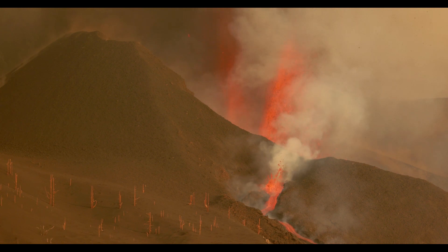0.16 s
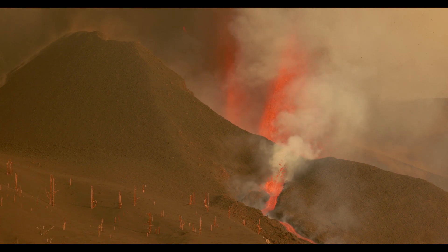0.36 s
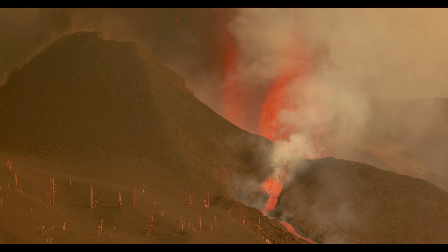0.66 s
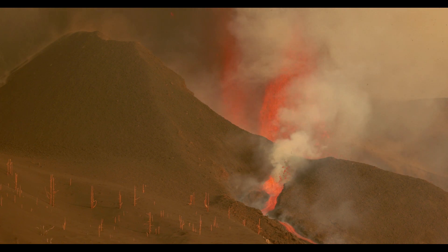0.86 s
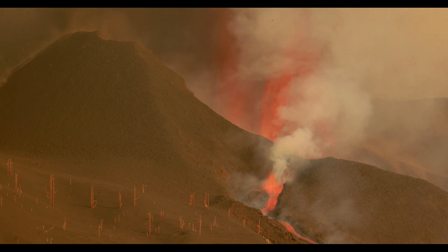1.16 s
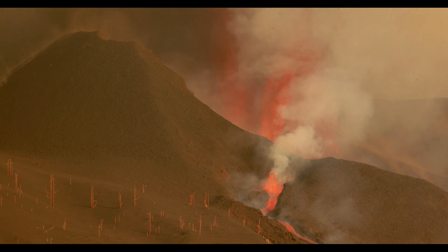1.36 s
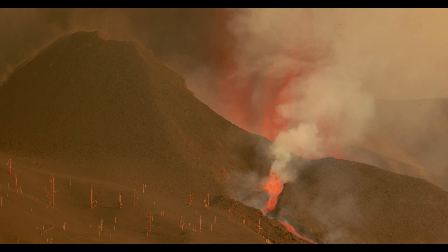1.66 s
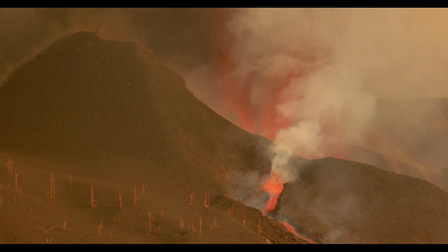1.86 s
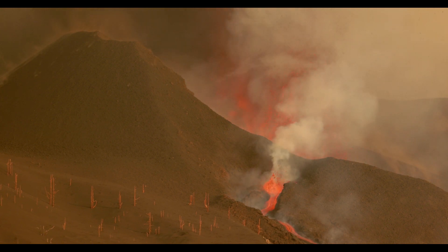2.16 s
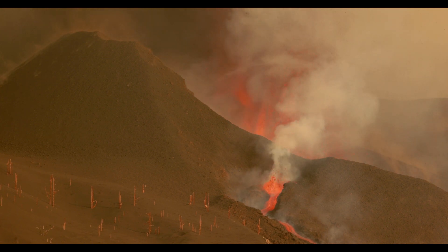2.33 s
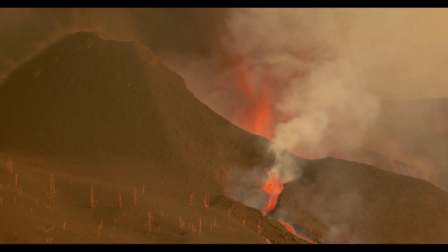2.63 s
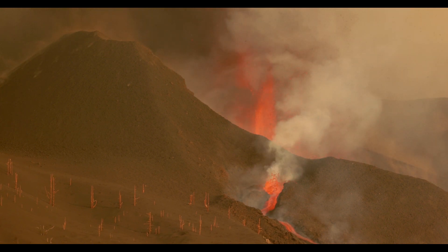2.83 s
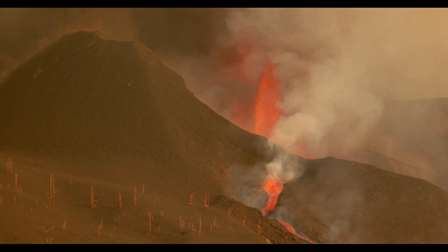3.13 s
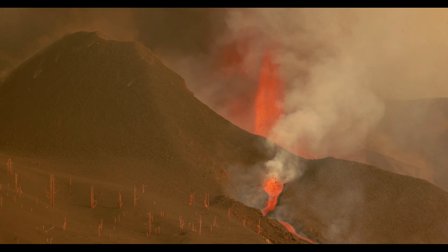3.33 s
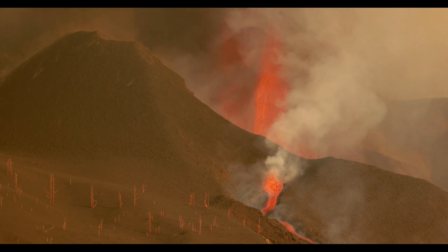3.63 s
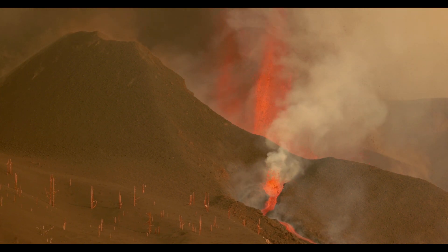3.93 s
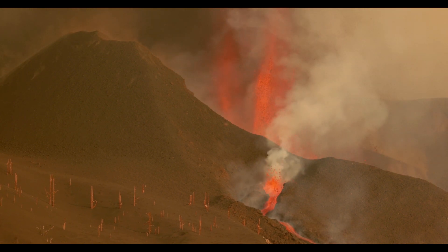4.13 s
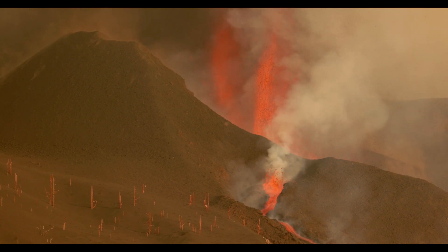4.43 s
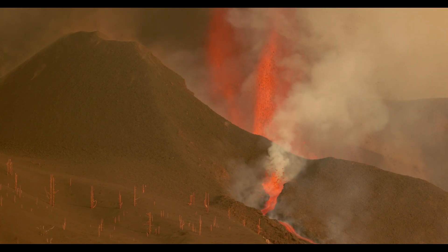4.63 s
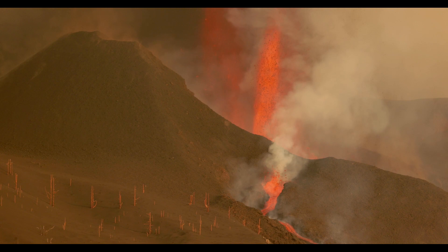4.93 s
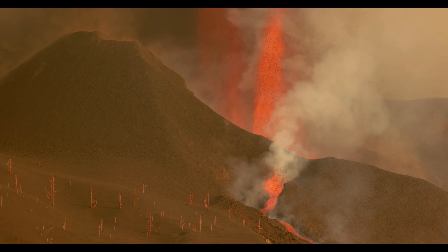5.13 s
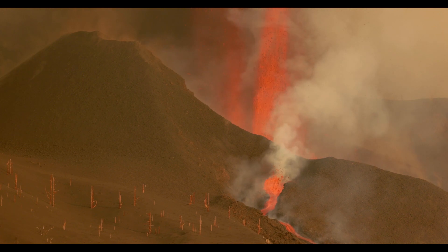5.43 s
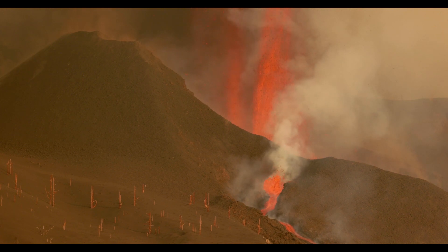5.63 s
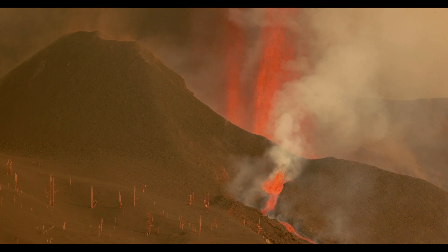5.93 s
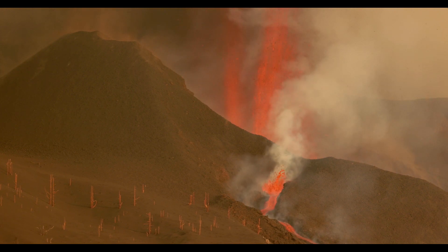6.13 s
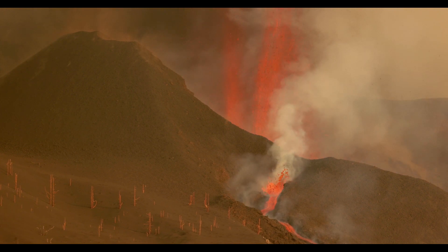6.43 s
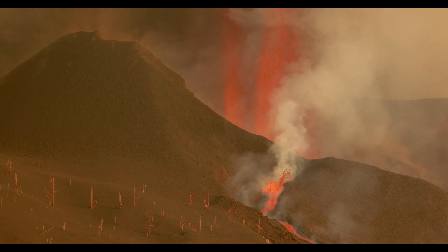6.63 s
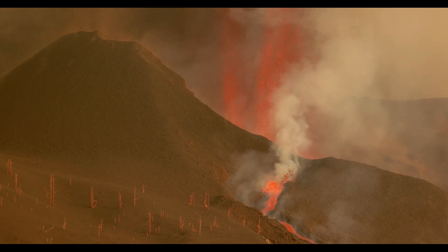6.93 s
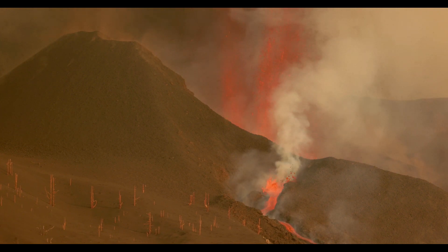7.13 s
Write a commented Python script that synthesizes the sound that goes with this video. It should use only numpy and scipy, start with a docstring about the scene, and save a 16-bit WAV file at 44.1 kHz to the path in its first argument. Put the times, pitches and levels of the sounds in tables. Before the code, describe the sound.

A lava fountain booms across a valley, heard by one mono microphone in the open. The bassy roar dips early, rebuilds to a loud peak near three seconds, then rolls on in irregular surges. Muffled low knocks stand out from the middle onward, and low wind buffeting grows. Very faint nearby details include early bright rustling, dry ticks, brief pips and a high thin whine.

```python
"""Distant lava fountain

Lava fountains roar from a vent far across a valley: countless random gas bursts, shaped by spectra, merge into a
deep rumble that sags and swells; a reflection notches it. Short dull thumps (damped pulses), perhaps wind knocking the
microphone, stand out. Close by are a soft hiss and wind (filtered noise), a thin tone that glides up and later holds
near 4350 Hz, perhaps a cricket, and pips (all sines), a rustle (fine grains) and small ticks (decaying noise)."""
import sys
import numpy as np
from scipy import signal
from scipy.fft import rfft, irfft
from scipy.io import wavfile
from scipy.ndimage import uniform_filter1d, minimum_filter1d

SR = 44100
rng = np.random.default_rng(int(sys.argv[2]) if len(sys.argv) > 2 else 0)


def file_out(sig):
    """Save sig as 16-bit WAV at sys.argv[1]."""
    # one column per channel
    cols = np.atleast_2d(sig).T
    # limit, then scale
    lim = np.clip(cols, -1, 1)
    pcm = np.round(lim * 32767).astype(np.int16)
    wavfile.write(sys.argv[1], SR, pcm)


N = 321048  # length in samples


def gain_of(db):
    """Logarithmic level: 20 dB is a factor of ten in amplitude."""
    return 10 ** (np.asarray(db) / 20)


def evened(x):
    """Normalisation: scales the root mean square to 1."""
    return x / np.sqrt(np.mean(x ** 2) + 1e-20)


def curve(rows):
    """Linear interpolation in time: every column of a table, one value a sample."""
    s, *columns = np.transpose(rows)
    return [np.interp(np.arange(N) / SR, s, c) for c in columns]


def read(points, hz):
    """Interpolation on a logarithmic frequency axis: a spectrum table at the given frequencies."""
    f, db = np.transpose(points)
    return np.interp(np.log(hz + 1), np.log(f + 1), db)


def coloured(x, points):
    """Linear filtering: multiplies the spectrum of x by the table; the rms becomes 1."""
    response = gain_of(read(points, np.fft.rfftfreq(N, 1 / SR)))
    return evened(irfft(rfft(x) * response, N))


def unit_band(x, band):
    """Parseval's theorem: scales x so that its part inside the band has rms 1."""
    hz, power = np.fft.rfftfreq(len(x), 1 / SR), abs(rfft(x)) ** 2
    inside = (hz > band[0]) & (hz < band[1])
    return evened(x) * np.sqrt(power.sum() / power[inside].sum())


def bursts(per_s, spread_db):
    """Shot noise: random pops of either sign, a few much larger than the rest."""
    size = gain_of(spread_db * np.minimum(rng.exponential(1, N), 4))
    happens = rng.random(N) < per_s / SR
    return size * rng.standard_normal(N) * happens


def drift(seconds):
    """Low-passed noise: a slow random course of rms 1."""
    width = max(round(seconds * SR), 1)
    return evened(uniform_filter1d(uniform_filter1d(rng.standard_normal(N), width), width))


def steadied(x, seconds, share):
    """Envelope compression: irons out part of a noise's chance lumps, for a steadier sound."""
    width = round(seconds * SR)
    power = uniform_filter1d(uniform_filter1d(x ** 2, width), width)
    return evened(x / (abs(power) + .02) ** (share / 2))


def bump(centre_s, width_s):
    """Gaussian envelope: a rise and fall of height 1; the width is its standard deviation."""
    return np.exp(-.5 * ((np.arange(N) / SR - centre_s) / width_s) ** 2)


def swells(rows, edge_s):
    """Amplitude envelope: events that fade in, hold and fade out; each fade is centred on its listed time."""
    t = np.arange(N) / SR
    total = 0
    for start, end, db in rows:
        openness = np.clip(np.minimum(t - start, end - t) / edge_s + .5, 0, 1)
        total = total + gain_of(db) * openness ** 2
    return total


def add(mix, s, sound):
    """Superposition: adds a sound to the mix from time s."""
    part = mix[round(s * SR):][:len(sound)]
    part += sound[:len(part)]


PIVOT_DB = -22  # boom level at which a following layer has its pivot level


def follow(boom_db, law):
    """Level law: a layer's level is linear in the boom's level and in time."""
    pivot_db, share, db_per_s = law
    return pivot_db + share * (boom_db - PIVOT_DB) + db_per_s * np.arange(N) / SR


# course of the fountain: t/s, boom level before drift and lulls/dB (110-380 Hz), extra roar/dB, extra grit/dB
FOUNTAIN = [(0, -18.5, -5.5, 0.5), (.12, -20.5, -1.5, -1), (.3, -27, 2.5, 2), (.55, -25, 0.5, -0.5),
            (.85, -33, -1, -3.5), (1.2, -31, 1, -1), (1.48, -37, 4, 1.5), (1.84, -24.5, 0, 0.5),
            (2.0, -24, 4.5, 2), (2.27, -23.5, 1, 2.5), (2.45, -16.5, -2, 0), (2.65, -19.5, 0.5, 1.5),
            (2.9, -21, 1, 2), (3.1, -11, -1.5, -2.5), (3.44, -17.5, 0, 0), (3.62, -14.5, 1.5, -3.5),
            (3.85, -20.5, 2, 1), (4.08, -23.5, 2, 2.5), (4.18, -18, 0, 1.5), (4.74, -19, -1, -1),
            (5.1, -23.5, 0.5, 2), (5.45, -19.5, 1, 2), (5.7, -24.5, 1.5, 2.5), (6.25, -23, -1, -1.5),
            (6.41, -22, 0, -1), (6.55, -27.5, 2, 0.5), (6.85, -27.5, -1, 1), (7.05, -26, 2, -2.5),
            (7.28, -27.5, -2.5, -2)]
# spectra of the four layers: f/Hz, relative level per hertz/dB
THUD_SPECTRUM = [(10, -84.5), (30, -45), (55, -18), (95, 1.5), (130, -3.5), (250, -46), (1000, -120)]
BOOM_SPECTRUM = [(20, -78.5), (70, -29), (120, 6.5), (210, 9), (300, 5.5), (400, -4.5), (700, -35.5),
                 (2000, -120)]
ROAR_SPECTRUM = [(50, -76.5), (200, -26.5), (330, -5.5), (480, 0), (680, -6), (900, -28), (1500, -45),
                 (5000, -120)]
GRIT_SPECTRUM = [(150, -81), (600, -14.5), (850, 1), (1000, 1.5), (1300, -8.5), (1700, -12), (2300, -25.5),
                 (3500, -41.5), (8000, -110)]
# how each layer follows the boom: level at the pivot/dB, share/(dB per dB), trend/(dB per s)
THUD_LAW, ROAR_LAW, GRIT_LAW = (-37.5, 0.96, 0.89), (-30, 0.87, -0.29), (-36, 0.78, -0.45)
# deep heaves under the boom: centre t/s, rise of thud level/dB
HEAVES = [(.08, 9), (.55, 4.5), (.95, 3), (1.22, 0), (1.68, 6), (1.97, 3.5), (2.5, 5.5), (2.87, 5.5),
          (3.07, 5), (3.62, 3.5), (4.47, 3.5), (4.72, 8), (5.37, 3.5), (5.66, 4), (6.03, 1.5), (6.55, 9.5),
          (7.1, 0)]
# moments when the boom drops out: centre t/s, depth of level/dB
LULLS = [(.15, 6), (.7, 1), (2.24, 4), (3.22, 2.5), (3.52, 6), (3.67, 6), (4.0, 2), (4.33, 11), (4.67, 2.5),
         (4.98, 6), (5.22, 6), (6.47, 2), (6.67, 6), (6.77, 1.5), (6.86, 4), (6.96, 4), (7.08, 1.5)]
HEAVE_S, LULL_S = .07, .018  # Gaussian widths
JET_SMOOTHING_S = 0.092  # thud, roar and grit follow the boom over this span
REFLECTION_S, REFLECTION_SHARE = 0.002347, 0.11  # delay, amplitude relative to the direct sound


def fountain():
    """Shot noise with interference: large gas slugs give thud and boom, the churning jet roar and grit."""
    boom_db, more_roar_db, more_grit_db = curve(FOUNTAIN)
    jet_db = uniform_filter1d(boom_db, round(JET_SMOOTHING_S * SR))
    thud_db = follow(jet_db, THUD_LAW) + sum(db * bump(s, HEAVE_S) for s, db in HEAVES)
    roar_db = follow(jet_db, ROAR_LAW) + more_roar_db
    grit_db = follow(jet_db, GRIT_LAW) + more_grit_db
    boom_db = boom_db + 1.2 * drift(.03) - sum(db * bump(s, LULL_S) for s, db in LULLS)

    # an inverted copy arriving a little late cuts shallow dips about 426 Hz apart
    delay = np.exp(-2j * np.pi * np.fft.rfftfreq(N, 1 / SR) * REFLECTION_S)
    interference = 1 - REFLECTION_SHARE * delay

    def reflected_bursts(per_s, spread_db):
        """Interference: bursts summed with their inverted reflection."""
        return irfft(rfft(bursts(per_s, spread_db)) * interference, N)

    slugs, blows = reflected_bursts(3085, 2.1), reflected_bursts(1505, 2.5)
    churn, spray = reflected_bursts(8910, 1.7), reflected_bursts(11720, 1.6)
    thud = unit_band(steadied(coloured(slugs, THUD_SPECTRUM), 0.083, 0.44), band=(50, 110))
    boom = unit_band(steadied(coloured(blows, BOOM_SPECTRUM), 0.0054, 0.29), band=(110, 380))
    roar = unit_band(steadied(coloured(churn, ROAR_SPECTRUM), 0.12, 0.3), band=(400, 750))
    grit = unit_band(coloured(spray, GRIT_SPECTRUM), band=(850, 1800))
    deep = thud * gain_of(thud_db) + boom * gain_of(boom_db)
    return deep + roar * gain_of(roar_db) + grit * gain_of(grit_db)


# spectrum of the buffeting: f/Hz, relative level per hertz/dB
BUFFET_SPECTRUM = [(8, -45.5), (22, -21), (38, -6), (55, 1.5), (100, -17), (300, -81), (1000, -130)]
# gusts, added to the calm: centre t/s, peak level of each/dB (18-45 Hz)
GUSTS = [(1.7, -65), (1.93, -58), (2.2, -55.5), (2.42, -50), (2.569, -53), (2.88, -55.5), (3.179, -52),
         (3.6, -63), (3.85, -54.5), (4.2, -47.5), (4.36, -51.5), (4.55, -52.5), (4.77, -48), (4.95, -47),
         (5.15, -49.5), (5.63, -45), (6.15, -40.5), (6.4, -43), (6.65, -43), (6.97, -44)]
CALM_DB, GUST_S = -75, 0.075  # level between gusts, Gaussian width


def wind():
    """Turbulent pressure fluctuation: lumpy low-frequency noise on the microphone."""
    lumps = steadied(coloured(rng.standard_normal(N), BUFFET_SPECTRUM), .1, .7)
    strength = gain_of(CALM_DB) + sum(gain_of(db) * bump(s, GUST_S) for s, db in GUSTS)
    return unit_band(lumps, band=(18, 45)) * strength


def patchy(patches_db):
    """Short-time spectral modulation: white noise whose spectrum drifts in soft patches."""
    real, imaginary, patches = rng.standard_normal((N // 128 + 5, 257, 3)).T
    patches = uniform_filter1d(patches, size=8, axis=0)  # smooth across frequency
    patches = evened(uniform_filter1d(patches, size=20, axis=1))  # smooth across time
    spectrum = (real + 1j * imaginary) * gain_of(patches_db * patches)
    return signal.istft(spectrum, nperseg=512, noverlap=384)[1][:N]


# open air: t/s, hiss level/dB (2.2-4 kHz), airy treble level/dB (6-12 kHz)
OUTDOORS = [(0.05, -54, -73.5), (0.49, -55.5, -67.5), (1.0, -55, -73), (1.4, -58, -73), (2.3, -54, -73),
            (2.6, -57.5, -74.5), (3.06, -53, -72.5), (3.18, -60.5, -78.5), (3.7, -59, -79.5),
            (4.3, -57, -76), (4.52, -54, -71.5), (4.7, -55.5, -73.5), (5.1, -53, -69.5), (5.7, -50, -69),
            (5.95, -51, -70), (6.5, -51, -70.5), (6.92, -49, -69.5), (7.28, -48.5, -70)]
# spectra of the two layers: f/Hz, relative level per hertz/dB
HISS_SPECTRUM = [(300, -34), (1000, 6), (2200, -2.5), (3200, -10), (4700, -22.5), (6300, -31),
                 (8000, -46.5), (15000, -90)]
AIR_SPECTRUM = [(1500, -25.5), (4000, 4), (5500, -2), (7000, -4.5), (10000, -12.5), (12500, -15),
                (15700, -17)]


def hiss():
    """Broadband noise: the open air as a mid hiss and an airy treble."""
    hiss_db, air_db = curve(OUTDOORS)
    mid = unit_band(coloured(patchy(0.62), HISS_SPECTRUM), band=(2200, 4000))
    air = unit_band(coloured(patchy(.6), AIR_SPECTRUM), band=(6000, 12000))
    return mid * gain_of(hiss_db) + air * gain_of(air_db)


# short pips: t/s, length/s, start f/Hz, end f/Hz, peak level/dB, approximate rms pitch jitter/Hz
PIPS = [(.19, .08, 6700, 6600, -64, 500), (1.175, .02, 3650, 3600, -63, 60),
        (2.53, .015, 3700, 3700, -61, 60), (2.61, .015, 3700, 3700, -61, 60),
        (2.785, .02, 3700, 3700, -61, 60), (5.49, .025, 3650, 3650, -59, 60),
        (.735, .055, 6050, 5650, -62, 40), (4.935, .045, 4180, 4110, -61, 30),
        (6.32, .075, 1290, 1480, -36, 10), (6.938, .012, 5900, 5800, -52, 200)]


def pips():
    """Frequency modulation: brief gliding tones, some made fuzzy by random pitch jitter."""
    out = np.zeros(N)
    wobble = rng.standard_normal((len(PIPS), 4000))
    for (s, length, start_hz, end_hz, db, fuzz_hz), jitter in zip(PIPS, wobble):
        hz = np.linspace(start_hz, end_hz, round(length * SR))
        hz = hz + fuzz_hz * evened(uniform_filter1d(jitter, size=30))[:len(hz)]
        tone = np.sin(2 * np.pi * np.cumsum(hz) / SR)
        add(out, s, gain_of(db) * np.hanning(len(hz)) * tone)
    return out


# spectrum of the rustle: f/Hz, relative level per hertz/dB
RUSTLE_SPECTRUM = [(1000, -17), (3000, 17), (6000, 9), (8500, -1), (9700, 2), (10500, -12), (11500, -2),
                   (14000, -1), (15500, -7)]
# strokes of the rustle: start t/s, end t/s, level/dB (11-15 kHz)
STROKES = [(.2, .36, -88), (.37, .63, -73.5), (.5, .57, -80), (.74, .92, -76), (.86, .89, -78)]


def rustle():
    """Granular noise: a bright, fine-grained brushing near the microphone."""
    grains = coloured(bursts(14000, spread_db=3.0), RUSTLE_SPECTRUM)
    return unit_band(grains, band=(11000, 15000)) * swells(STROKES, edge_s=.08)


# ticks: t/s, rms level before the decay/dB, centre f/Hz, bandwidth/Hz
TICKS = [(.580, -56, 7000, 5500), (.785, -62, 7500, 2000), (.812, -59, 8000, 2000), (.831, -56, 7500, 5000),
         (.871, -58, 10000, 7000), (1.84, -59, 8000, 4000), (4.487, -59, 6500, 5050),
         (4.79, -59, 7500, 2000), (4.827, -54.5, 8000, 5000), (4.865, -58, 8500, 4550),
         (6.409, -57, 7160, 2500), (6.459, -57, 8000, 5030), (6.495, -55, 8000, 5030),
         (6.943, -59, 8000, 5000)]


def ticks():
    """Exponential decay: each tick is a few milliseconds of noise around its own pitch."""
    out, t = np.zeros(N), np.arange(900) / SR
    noise = rng.standard_normal((len(TICKS), 900))
    for (s, db, hz, width), puff in zip(TICKS, noise):
        edges = np.clip([hz - width / 2, hz + width / 2], 500, 15000)
        band = signal.butter(2, edges, "band", fs=SR)
        add(out, s, gain_of(db) * evened(signal.lfilter(*band, puff)) * np.exp(-t / 0.0028))
    return out


# one pitch curve joining the rising tone and the later phrases, before wavering: t/s, f/Hz
TONE_PITCH = [(.7, 4200), (1, 4255), (2.2, 4385), (2.8, 4435), (3.4, 4492), (3.95, 4540), (4.6, 4500),
              (5, 4440), (5.25, 4378), (5.55, 4375), (5.65, 4353), (6.2, 4342), (7, 4352), (7.28, 4335)]
# phrases, added to the faint tone: start t/s, end t/s, level before wavering/dB
TONE_PHRASES = [(.72, 1.02, -72), (2.1, 2.75, -87), (2.8, 2.95, -79), (2.95, 3.3, -74), (3.3, 3.68, -79),
                (3.92, 4.15, -78), (4.25, 4.8, -83), (5.29, 5.53, -64), (5.62, 5.78, -69), (5.8, 6.3, -78),
                (6.9, 7.03, -73), (7.03, 7.13, -63), (7.15, 7.3, -76)]
TONE_FAINT_DB, TONE_EDGE_S = -86, .06  # level between phrases, fade time


def thin_tone():
    """Phase as the integral of frequency: a thin tone glides up; later phrases hold near 4350 Hz."""
    sounding = np.arange(N) > TONE_PITCH[0][0] * SR
    hz = curve(TONE_PITCH)[0] + 5.0 * drift(0.016)
    turns = np.cumsum(hz) / SR
    level = gain_of(TONE_FAINT_DB) + swells(TONE_PHRASES, TONE_EDGE_S)
    wavering = gain_of(1.9 * drift(0.037))
    return sounding * np.sqrt(2) * level * wavering * np.sin(2 * np.pi * turns)  # root 2: rms to peak


# short dull thumps: t/s, envelope peak level before the high-pass/dB, final f/Hz
THUMPS = [(2.483, -6, 239), (2.531, -6, 229), (3.25, -9.5, 203), (3.555, -8, 196), (3.856, -6, 244),
          (4.702, -6, 150), (4.933, -8.5, 260), (5.096, -8, 176), (6.365, -16, 188), (6.393, -8, 200),
          (6.418, -11, 170), (6.503, -13, 182), (6.531, -10.5, 158), (6.626, -14, 130), (6.691, -16, 217),
          (6.809, -16, 160), (6.922, -13.5, 161), (6.987, -11, 172), (7.17, -14, 250)]


def thumps():
    """Damped pulse: each short dull thump swings for about three cycles, perhaps wind knocking the microphone."""
    out, t = np.zeros(N), np.arange(2600) / SR
    for (s, db, hz), phase in zip(THUMPS, rng.random(len(THUMPS))):
        age = t * hz / 0.73  # 1 at the envelope's peak
        envelope = age ** 2 * np.exp(2 - 2 * age)
        # the front is steeper, so the pitch sags from a higher start
        turns = hz * t + 0.5 * (1 - np.exp(-age / 0.5))
        add(out, s, gain_of(db) * envelope * np.sin(2 * np.pi * (turns + phase)))
    # the high-pass removes the constant offset and deepest bass of the pulses
    return signal.sosfilt(signal.butter(2, 70, "high", fs=SR, output="sos"), out)


def scene():
    """Superposition: the far vent and the near sounds, heard by one microphone."""
    near = wind() + hiss() + pips() + rustle() + ticks() + thin_tone() + thumps()
    return (fountain() + near)[None]


CEILING, EDGE_HZ = .86, 15720  # limiter's peak amplitude, upper band limit


def record(dry):
    """Gain reduction and low-pass filtering: a limiter eases the highest peaks, then the treble is cut off."""
    allowed = minimum_filter1d(CEILING / np.maximum(abs(dry), CEILING), size=801)
    limited = dry * uniform_filter1d(uniform_filter1d(allowed, size=400), size=400)
    low_pass = signal.firwin(1023, EDGE_HZ, window=("kaiser", 9), fs=SR)
    return signal.oaconvolve(limited, low_pass[None], "same")


dry = scene()
out = record(dry)
file_out(out)
```